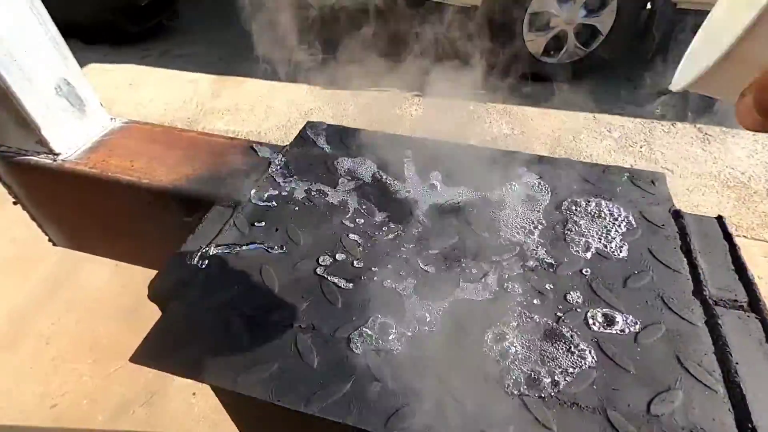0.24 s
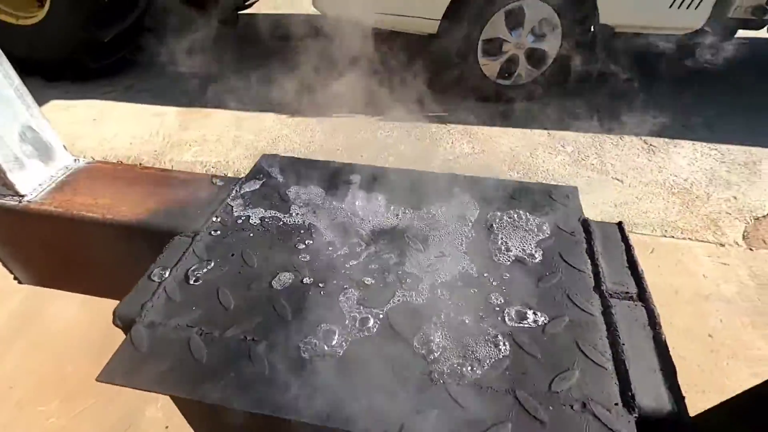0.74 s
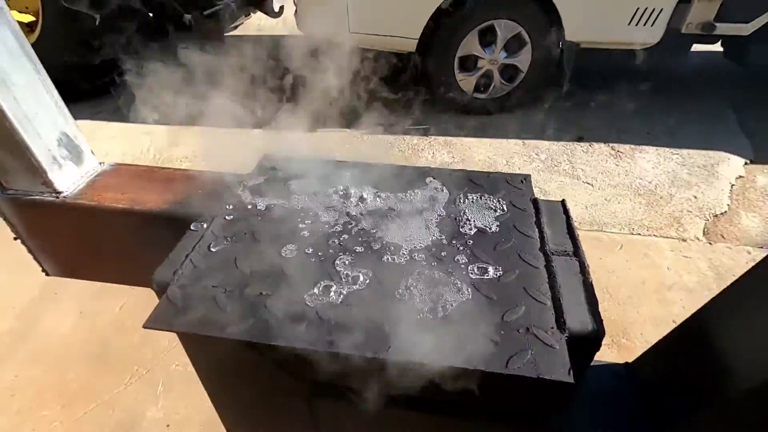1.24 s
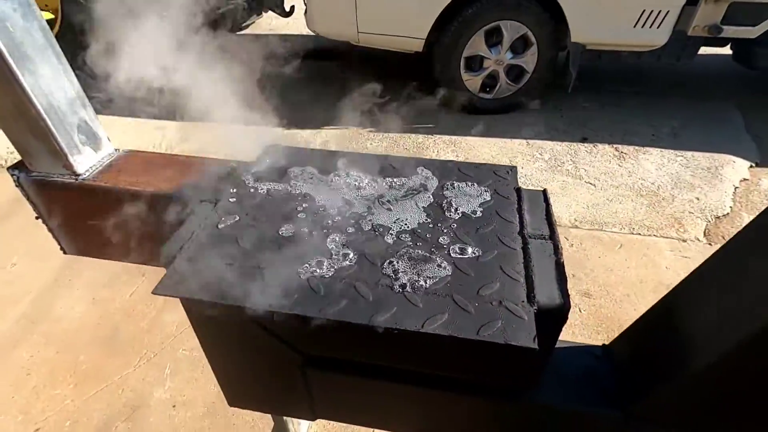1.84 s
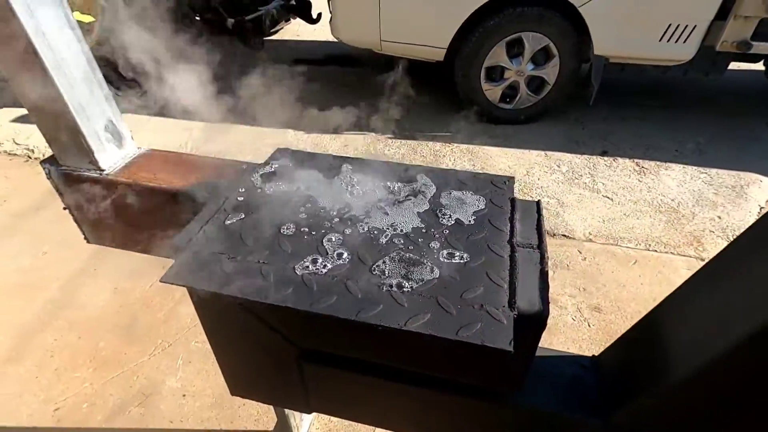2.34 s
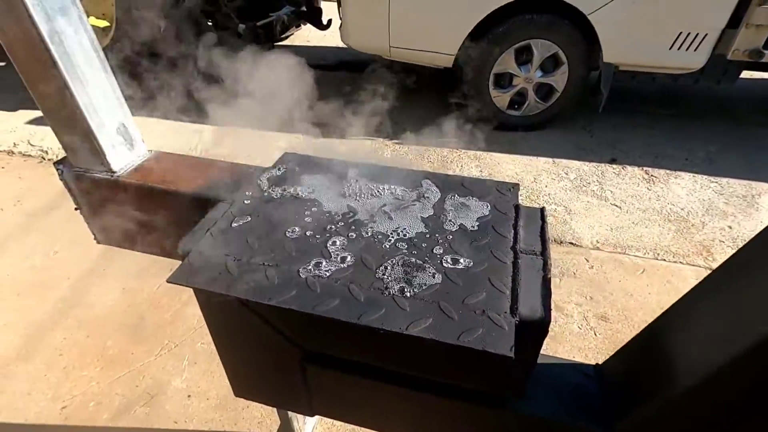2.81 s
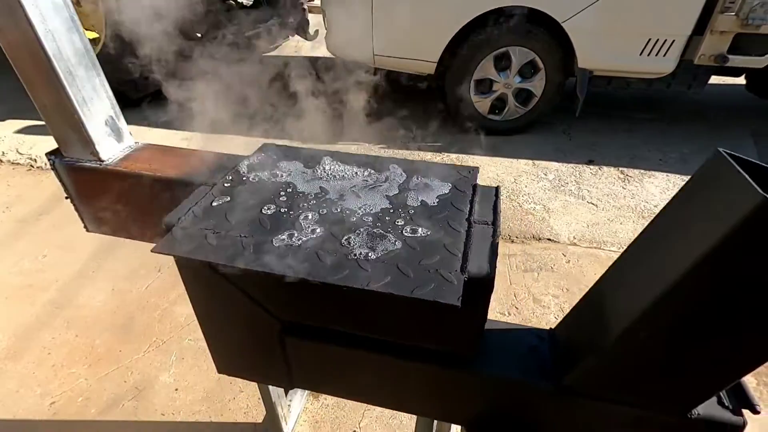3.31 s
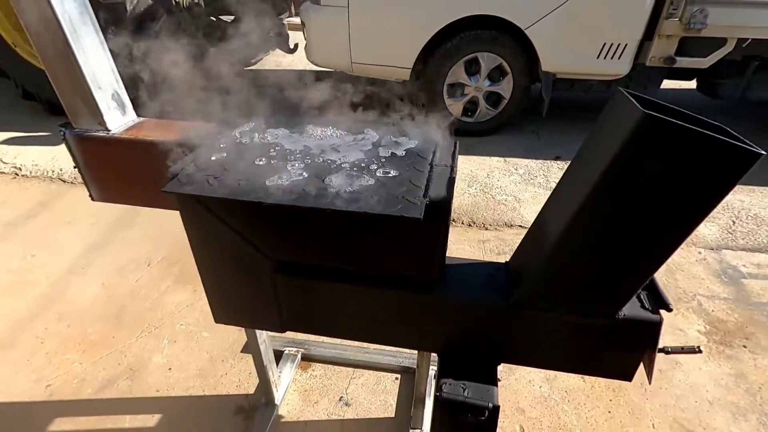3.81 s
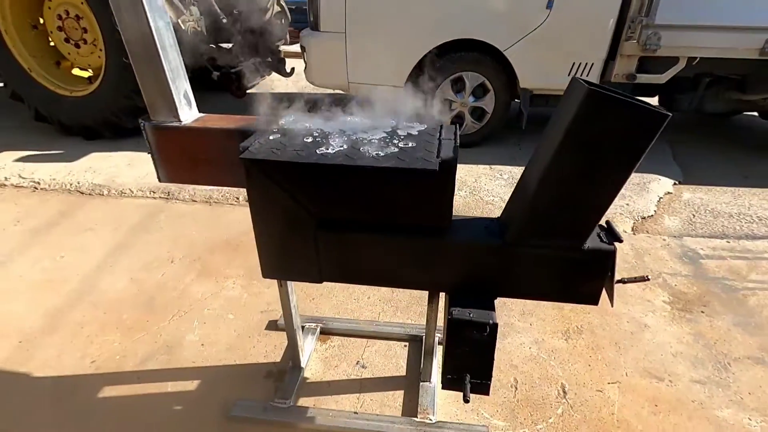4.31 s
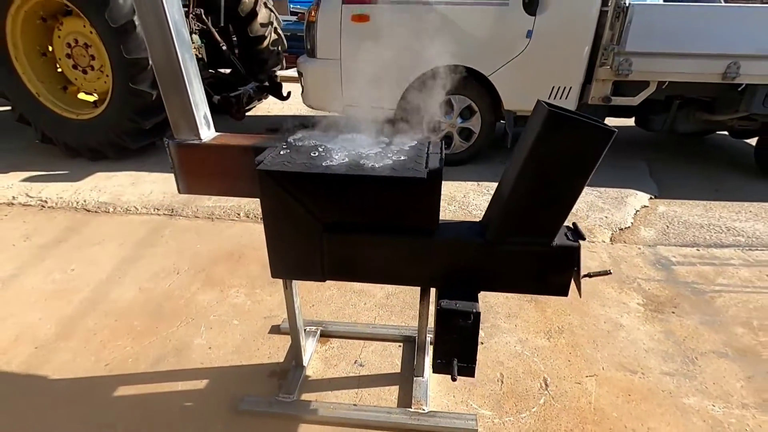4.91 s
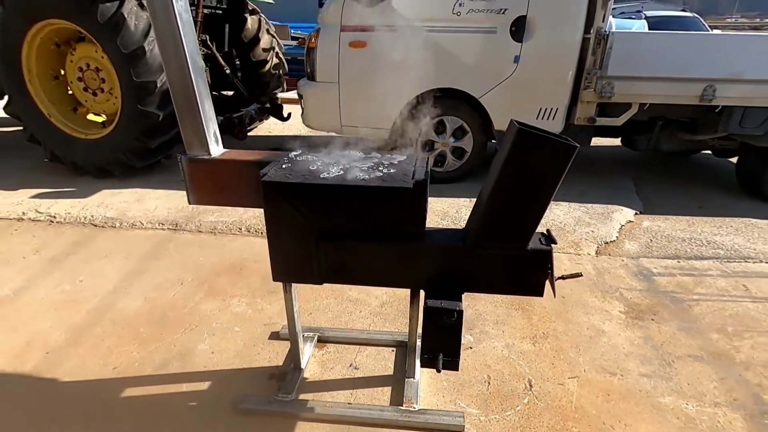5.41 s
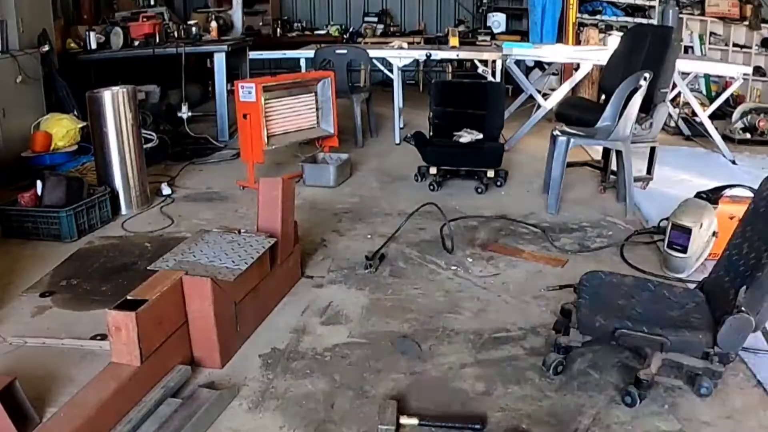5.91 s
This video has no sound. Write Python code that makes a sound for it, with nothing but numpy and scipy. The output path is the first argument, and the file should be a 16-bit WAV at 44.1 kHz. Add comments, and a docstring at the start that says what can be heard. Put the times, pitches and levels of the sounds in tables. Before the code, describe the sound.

From 0 s, water boils on a hot steel stove top close to the microphone: a dense, bright, crackling sizzle, strongest between the low mids and highs, wide in stereo. During the first 0.6 s the pour gurgles and low steam pockets plop softly. At about 0.7 s big blisters seethe and skating drops give a short falling whistle; a soft knock lands at 0.8 s. Coarse boiling swells near 1.1 and 1.5 s, then the sound leans left. Around 2 s a cluster of dull handling taps with a scuff and sharp tick occurs. From 3 s the sizzle recedes steadily, turning finer and narrower, with faint shifting resonances, while a deep, unsteady flue hum near 60 Hz and fire rumble rise. Soft double knocks come at 4 and 5 s. Faint open air and dull yard reflections remain until a louder hiss bursts at 5.99 s and stops abruptly.

```python
"""Outdoors, on the hot steel top of a wood stove, water boils in thousands of tiny steam bursts a second.
The sizzle fades as the camera backs away, and narrow resonant bands swell and fade in it as reflections
off plate and ground shift. The last of the pour gurgles and plops as ringing bubbles, and skating drops
whistle as gliding sines. The draught sounds a low hum in the flue. The hand on the camera rings its case
in soft knocks and a noisy scuff. A short, louder hiss of dense clicks ends the sound abruptly."""
import sys
import numpy as np
from scipy import signal
from scipy.fft import rfft, irfft, next_fast_len
from scipy.io import wavfile
from scipy.ndimage import map_coordinates

SR = 44100
rng = np.random.default_rng(int(sys.argv[2]) if len(sys.argv) > 2 else 0)


def to_wav(s):
    """Save 16-bit WAV."""
    ch = np.atleast_2d(s).T  # columns
    pcm = np.round(np.clip(ch, -1, 1) * 32767)  # PCM
    wavfile.write(sys.argv[1], SR, pcm.astype(np.int16))


N = 271215

# vigour of the boiling before distance loss: (time [s], relative level [dB])
BOIL_LEVEL = [(0, -45), (.27, -46.5), (.42, -45.5), (.5, -45), (.66, -46), (.95, -46), (1.05, -47.5),
              (1.22, -46.5), (1.5, -49.5), (1.73, -49), (1.93, -46.5), (2.3, -47), (3.3, -47), (3.8, -47),
              (5.97, -47)]
# spectrum of the steam bursts: (frequency [Hz], relative density [dB])
SIZZLE_SPECTRUM = [(240, -41), (400, -24), (702, -16), (980, -12.5), (1130, -7), (1410, -5), (1600, -4),
                   (2720, 0.5), (3270, 0.5), (5480, -6), (6680, -9), (8400, -16), (9060, -21), (11600, -25),
                   (14300, -35.5), (15200, -49)]
# colour of the microphone ports: (centre [Hz], width [Hz], gain [dB])
PORT_RESONANCES = [(1250, 230, 1.5), (3040, 300, .5), (5600, 370, -1.5), (6230, 460, 2), (8440, 390, -5.5),
                   (8940, 270, 6), (13700, 800, -1.5)]
# left-right likeness of the sizzle before width and lean: (frequency [Hz], correlation [0-1])
SIZZLE_LIKENESS = [(300, 0.92), (1000, 1), (1500, 0.96), (2500, 0.97), (4000, 0.96), (6500, 0.9),
                   (8300, 0.71), (8950, 0.7), (10000, 0.59), (12500, .5), (14000, 1)]
# full lean to the left: (frequency [Hz], left minus right [dB])
LEAN_SPECTRUM = [(1000, -1), (1600, 7), (3000, 4), (4200, 3.5), (7000, 2.5), (10000, 0.5)]
# the camera turns and backs away: (time [s], distance [m], share of the full lean [0-1])
CAMERA_PATH = [(0, 0.52, 0.08), (.5, 0.53, 0.084), (1.05, 0.48, 0.41), (2.4, 0.53, 0.48),
               (3.17, 0.58, 0.43), (4.0, 0.81, 0.5), (4.6, 1.24, 0.63), (5.3, 2.11, 0.57), (5.97, 2.2, 0.6)]
# stereo width: side gain at half a metre [dB], its loss per dB of distance
WIDTH_DB, NARROWING = -0.5, 0.35
# the water first spreads right across the view, so it sounds wider: fade start [s], fade [s], extra [dB]
NEAR_S, NEAR_FADE_S, NEAR_WIDTH_DB = 0.45, 0.61, 3.5
# blisters grow, then collapse, and the coarse boiling swells: (peak [s], rise [s], fall [s], swell [dB])
BLISTER_SURGES = [(1.1, .75, 0.11, 4), (1.105, .015, .03, 1.5), (1.5, 0.45, 0.41, 4.5),
                  (3.335, .025, 0.071, 3.5), (3.5, .03, 0.054, 2), (5.03, .15, .05, 4),
                  (5.25, .03, 0.2, 6.5)]
# water on dry steel throws fine spray: (peak [s], rise [s], fall [s], swell [dB])
SPRAY_SURGES = [(.72, .04, 0.59, 2), (1.2, 0.058, 0.22, 1.5), (1.62, .2, .25, 0.5), (3.86, .03, 0.049, 0.5),
                (4.72, 0.029, .08, 1.8)]
# the puddles thin out, so the boiling turns finer; band gains while wet and when thin
THIN_S, THIN_LENGTH_S = 3.6, 0.84
COARSE_WET_DB, COARSE_THIN_DB = -0.5, -4.5
FINE_WET_DB, FINE_THIN_DB = 0, 3
TOP_WET_DB, TOP_THIN_DB = 1.5, 2.5
# single sharp bursts that stand out: rate [1/s], level against the other clicks [dB]
SNAP_RATE, SNAP_DB = 45, -18.5
# narrow resonant bands in the sizzle, from reflections off plate and ground:
# (middle [s], length [s], centre [Hz], peak level at 1 m [dB])
REFLECTION_BANDS = [(1.404, 0.46, 2180, -58), (2.05, 0.35, 2120, -58), (2.729, 0.57, 2620, -55),
                    (4.2, .55, 4340, -59), (5.2, .5, 5300, -63), (5.748, .6, 6130, -61)]
# gurgles of the poured water: (middle [s], length [s], bubble pitch [Hz], peak level [dB])
POUR_GURGLES = [(.09, 0.24, 240, -63.5), (.34, 0.2, 483, -61.5), (.56, 0.12, 253, -65)]
# the fresh puddle boils in big blisters: start, rise, level and fade
SEETHE_S, SEETHE_RISE_S, SEETHE_DB, SEETHE_FADE_DB_PER_S = 0.67, 0.042, -55, 15
# drops whistling on their steam cushions:
# (start [s], length [s], mean start pitch [Hz], mean end pitch [Hz], mean peak level [dB])
DROP_WHISTLES = [(0.71, 0.119, 1800, 1380, -45.5), (0.566, 0.033, 800, 645, -55),
                 (0.727, 0.073, 1300, 1420, -52)]
# big steam pockets: (onset [s], starting pitch [Hz], t60 [s], level before the soft start [dB])
STEAM_POCKETS = [(.101, 175, 0.053, -38), (.14, 245, 0.077, -46), (0.36, 150, .14, -49),
                 (.415, 145, .05, -46), (.492, 135, .06, -44), (0.528, 191, .06, -45), (.59, 210, .06, -51),
                 (.937, 175, 0.055, -50), (1.055, 170, 0.054, -52), (2.052, 170, .05, -47)]
# soft start; share by which the pitch rises over one t60
PLOP_ATTACK_S, PLOP_RISE = 0.0041, 0.22
# soft knocks on the camera, most landing more than once:
# (onset [s], level [dB], pitch factor on the case modes [-], t60 before mode share [s], tick level [dB])
CASE_KNOCKS = [(.8148, -31.5, 1.16, 0.011, -55.5), (1.9685, -42, 0.67, .022, -43),
               (1.974, -42, 0.82, .028, -45), (1.98, -50, 0.88, .015, -42), (1.9965, -50, 1.4, .015, -40),
               (2.001, -48, 0.66, .02, -28), (2.005, -45, 0.72, 0.028, -44), (2.012, -45, 1.1, 0.022, -44),
               (4.0112, -47, 1.9, .015, -60), (4.0147, -36, 0.97, 0.042, -60),
               (4.0287, -39, 1.22, 0.029, -64), (4.046, -46, 1.3, .025, -66), (4.996, -51.5, 1, .015, -52),
               (4.9987, -40.5, 0.98, 0.037, -51), (5.0145, -36, 2.3, 0.0083, -47),
               (5.0245, -49, 1.0, 0.033, -56), (5.056, -58, 1.1, .02, -50)]
# modes of the camera case: (frequency at pitch factor 1 [Hz], level in the knock [dB], share of its t60 [-])
CASE_MODES = [(210, -19, 0.61), (291, 6, 0.69), (450, -10, 0.97)]
CONTACT_S = 0.0013  # soft skin rounds the front of each knock
TAIL_DB, TAIL_T60_S = -10.5, 0.35  # faint tail of the knocks
# spectrum of the knocks' ticks: (frequency [Hz], gain [dB])
TICK_SPECTRUM = [(100, -4.5), (600, 2.5), (1500, 15), (4000, 1), (8000, -5), (14000, -28)]
# spectrum of skin dragging on the case: (frequency [Hz], relative density [dB])
SKIN_SPECTRUM = [(80, -10), (165, 14.5), (260, 6), (380, 11.5), (700, 4), (1200, 11.5), (2500, -15),
                 (6000, -6), (7200, 11), (8700, 4), (9600, -5), (15000, -21)]
SCUFF_S, SCUFF_LENGTH_S, SCUFF_DB = 1.994, 0.064, -42.5  # middle, length, peak level
# the closing hiss: (frequency [Hz], relative density [dB])
HISS_SPECTRUM = [(80, -31), (200, -11), (550, -18), (1400, -4.5), (3500, -2), (6000, -10.5), (10000, -24),
                 (15000, -37)]
HISS_START_S, END_S = 5.989, 6.02
# the stove's draught, strongest beside the fire mouth: (time [s], level without flares [dB])
DRAUGHT_LEVEL = [(0, -71), (.7, -66), (.95, -79), (1.3, -60.5), (2.0, -69), (2.35, -73), (3.03, -76),
                 (3.1, -62), (3.19, -56), (3.27, -50), (3.45, -54), (3.64, -61), (3.73, -51.5), (4.07, -48),
                 (4.17, -54.5), (4.3, -50), (4.5, -52), (4.6, -45), (4.8, -46.5), (5.0, -47.5), (5.42, -47),
                 (5.55, -51.5), (5.97, -51.5)]
# the fire flares up: (middle [s], length [s], peak gain added to the draught [dB])
FIRE_FLARES = [(.008, 0.05, -49.5), (1.52, 0.42, -61.5), (2.081, .02, -56), (2.14, 0.028, -49),
               (2.167, .026, -47), (3.345, 0.1, -47.5)]
# the flue's lowest resonance: (time [s], mean pitch [Hz])
FLUE_PITCH = [(0, 60.6), (3.05, 60), (3.33, 54.96), (3.8, 62.2), (4.15, 56.6), (4.58, 61.33), (4.9, 58.24),
              (5.25, 59), (5.45, 57.1), (5.97, 58.9)]
FLUE_DRIFT_HZ, THROB_DB = 1.096, -15  # scale of its unsteadiness; turbulence around the pitch
# turbulence around the lowest and the next flue resonance: (frequency [Hz], relative density [dB])
THROB_SPECTRUM = [(35, -40.5), (50, -19), (56, -2), (68, 1.5), (75, -15.5), (110, -48), (300, -100)]
UPPER_SPECTRUM = [(60, -46.5), (80, -14.0), (92, 0.0), (104, -25.0), (170, -22.5), (400, -93.5)]
# rumble of the fire: (frequency [Hz], relative density [dB])
RUMBLE_SPECTRUM = [(10, -34.5), (20, 5), (45, -2), (60, 5), (75, -2.5), (90, -0.5), (115, -12.5),
                   (200, -28.5), (400, -100)]
# level at full draught [dB], dB per dB of draught, full draught [dB]
RUMBLE_DB, RUMBLE_FOLLOWS, FULL_DRAUGHT_DB = -56.5, 0.32, -53.5
# outdoor air: (frequency [Hz], relative density [dB])
AIR_SPECTRUM = [(60, -22.5), (120, -2), (180, 4.5), (260, -2.5), (400, 0.5), (800, -7.5), (2000, -17.5),
                (8000, -51)]
AIR_DB, AIR_FADE_DB_PER_S = -61.5, 1.16
# the boiling as the yard throws it back: (frequency [Hz], relative density [dB])
YARD_SPECTRUM = [(300, -25.5), (800, -19), (1200, -1), (1700, -0.5), (2500, -9.5), (5000, -11.5),
                 (10000, -38)]
YARD_DB = -17.5  # level against BOIL_LEVEL
TOP_HZ = 15150  # band limit


def sizzle():
    """Random impulses: clumped steam bursts over their blurred hiss; big blisters are low, spray is high."""
    level_db, coarse_db, fine_db, top_db = boiling()
    clumps = amp(0.48 * wobble(70) + 0.14 * wobble(350))
    blurred_hiss = rng.standard_normal((2, N))
    clicks = unit(clumps * (bursts(count=2, rate=11000, scatter_db=3) + blurred_hiss))
    clicks = clicks + amp(SNAP_DB) * bursts(count=2, rate=SNAP_RATE, scatter_db=1.0)
    steam = spread(ring(clicks, lambda hz: along(SIZZLE_SPECTRUM, hz) + port_db(hz)), SIZZLE_LIKENESS)
    # some blisters ring briefly before they burst
    blisters = bubbles(count=2400, centre_hz=3126, octaves=0.3, cycles=20.0, scatter_db=5.0)
    steam = steam + amp(-12.5) * blisters

    # complementary bands, each with its own level and flicker
    top = above(steam, 8400, order=20)
    coarse = steam - above(steam, 2300, order=8)
    fine = above(steam, 4900, order=6) - top
    middle = steam - coarse - fine - top
    flicker_db = 0.44 * wobble(25)
    mix = middle + amp(coarse_db + 0.7 * wobble(35)) * coarse
    mix = mix + amp(fine_db + flicker_db) * fine
    mix = mix + amp(top_db + flicker_db) * top
    return at_camera(amp(level_db + 1.34) * mix)


def boiling():
    """Distance law: level falls as 1/r; surges and thinning set the coarse, fine and top bands, all in dB."""
    level_db = curves(BOIL_LEVEL)[0] - 20 * np.log10(curves(CAMERA_PATH)[0])
    thin = ramp(THIN_S, THIN_LENGTH_S)
    spray_db = surges(SPRAY_SURGES)
    coarse_db = (1 - thin) * COARSE_WET_DB + thin * COARSE_THIN_DB + surges(BLISTER_SURGES)
    fine_db = (1 - thin) * FINE_WET_DB + thin * FINE_THIN_DB + spray_db
    top_db = (1 - thin) * TOP_WET_DB + thin * TOP_THIN_DB + spray_db
    return level_db, coarse_db, fine_db, top_db


def surges(rows):
    """Linear rise and fall, in dB, around each peak."""
    return sum(db * (ramp(s - rise, rise) - ramp(s, fall)) for s, rise, fall, db in rows)


def port_db(hz):
    """Port resonance: Gaussian peaks and dips in the response, in dB."""
    return sum(db * np.exp(-0.5 * ((hz - centre) / width) ** 2) for centre, width, db in PORT_RESONANCES)


def at_camera(x):
    """Apparent source width: wide when near, narrow when far; the side facing the plate hears more."""
    distance_m, lean = curves(CAMERA_PATH)
    width_db = WIDTH_DB - NARROWING * 20 * np.log10(2 * distance_m)
    width_db = width_db + NEAR_WIDTH_DB * (1 - ramp(NEAR_S, NEAR_FADE_S))
    mid = x.mean(axis=0)
    x = mid + amp(width_db) * (x - mid)
    half_each = np.array([[0.5], [-0.5]])
    leaning = filtered(x, lambda hz: amp(half_each * along(LEAN_SPECTRUM, hz)))
    return x + lean * (leaning - x)


def reflections():
    """Interference: reflections shifting with the moving camera, heard as narrow bands of ringing grains."""
    bands = 0
    for s, length, hz, db in REFLECTION_BANDS:
        band = bubbles(count=2500, centre_hz=hz, octaves=0.035, cycles=14, scatter_db=2.0)
        bands = bands + swell(s, length, db) * band
    return bands / curves(CAMERA_PATH)[0]


def water():
    """Damped bubble resonance gives gurgle and seethe; skating drops are unsteady, gliding sines."""
    out = np.zeros(N)
    for s, length, hz, db in POUR_GURGLES:
        gurgle = bubbles(count=500, centre_hz=hz, octaves=0.3, cycles=4, scatter_db=-1.0)
        out = out + swell(s, length, db) * gurgle

    seethe_db = SEETHE_DB - SEETHE_FADE_DB_PER_S * (np.arange(N) / SR - SEETHE_S)
    seethe = ramp(SEETHE_S, SEETHE_RISE_S) * amp(seethe_db)
    out = out + seethe * bubbles(count=1800, centre_hz=808, octaves=0.35, cycles=3.2, scatter_db=-1.0)

    for s, length, start_hz, end_hz, db in DROP_WHISTLES:
        life = ramp(s, length)
        hz = (start_hz + (end_hz - start_hz) * life) * (1 + 0.0066 * wobble(120))
        whistle = np.sin(2 * np.pi * np.cumsum(hz) / SR)
        out = out + amp(db + 1.8 * wobble(91)) * np.sin(np.pi * life) * whistle
    return out


def plops():
    """Volume resonance of big steam pockets: short, damped low notes that rise a little."""
    out = np.zeros(N + SR)
    t = np.arange(SR // 5) / SR
    for s, hz, t60, db in STEAM_POCKETS:
        turns = hz * (t + PLOP_RISE * t ** 2 / (2 * t60))
        envelope = amp(db - 60 * t / t60) * (1 - np.exp(-t / PLOP_ATTACK_S))
        out[round(s * SR):][:len(t)] += envelope * np.sin(2 * np.pi * turns)
    return out[:N]


def handling():
    """Modal excitation: contacts ring the camera case and tick; a dragging finger makes friction noise."""
    thumps, ticks = np.zeros((2, N + SR))
    t = np.arange(SR // 8) / SR
    for s, db, pitch, t60, tick_db in CASE_KNOCKS:
        case = 0
        for hz, level_db, share in CASE_MODES:
            decay = amp(-60 * t / (t60 * share))
            case = case + amp(level_db) * np.sin(2 * np.pi * pitch * hz * t) * decay
        thumps[round(s * SR):][:len(t)] += amp(db) * (1 - np.exp(-t / CONTACT_S)) * case
        tick = rng.standard_normal(len(t)) * np.exp(-t / 0.0008)
        ticks[round(s * SR):][:len(t)] += amp(tick_db) * tick
    coloured_ticks = ring(ticks[None], lambda hz: along(TICK_SPECTRUM, hz))

    grains = bursts(count=2, rate=1500, scatter_db=3.0)
    scuff = spread(ring(grains, lambda hz: along(SKIN_SPECTRUM, hz)), [(100, 0.97)])
    scuff = swell(SCUFF_S, SCUFF_LENGTH_S, SCUFF_DB) * scuff
    return thumps[:N] + afterring(thumps) + coloured_ticks + scuff


def afterring(x):
    """Diffuse decay: a faint tail of exponentially fading noise behind x."""
    t = np.arange(SR // 2) / SR
    tail = rng.standard_normal(len(t)) * amp(-60 * t / TAIL_T60_S) * (1 - np.exp(-t / 0.02))
    return amp(TAIL_DB) * signal.fftconvolve(x, tail / np.linalg.norm(tail))[:N]


def last_hiss():
    """Dense impulse noise: clicks of fluctuating strength fuse into an abrupt, crackling hiss."""
    crackle = bursts(count=2, rate=6000, scatter_db=3) * amp(1.0 * wobble(300))
    hiss = spread(ring(crackle, lambda hz: along(HISS_SPECTRUM, hz)), [(100, 0.91)])
    return amp(-38) * (np.arange(N) / SR > HISS_START_S) * hiss


def stove():
    """Pipe resonance: draught sounds the flue's lowest mode and, fainter, the next; fire rumbles in open air."""
    flares = sum(swell(s, length, db) for s, length, db in FIRE_FLARES)
    draught_db = 20 * np.log10(amp(curves(DRAUGHT_LEVEL)[0]) + flares)
    pitch_hz = curves(FLUE_PITCH)[0] + FLUE_DRIFT_HZ * wobble(10)
    hum = unit(np.sin(2 * np.pi * np.cumsum(pitch_hz) / SR) * amp(2.6 * wobble(22)))
    throb = noise(THROB_SPECTRUM, likeness=1.0)
    upper = noise(UPPER_SPECTRUM, likeness=0.92)
    flue = amp(draught_db) * (amp(-3.5) * hum + amp(THROB_DB) * throb + amp(-16.0) * upper)

    rumble_db = RUMBLE_DB + RUMBLE_FOLLOWS * (draught_db - FULL_DRAUGHT_DB)
    rumble = amp(rumble_db) * noise(RUMBLE_SPECTRUM, likeness=0.94)
    air_db = AIR_DB - AIR_FADE_DB_PER_S * np.arange(N) / SR
    air = amp(air_db + 1.1 * wobble(16)) * noise(AIR_SPECTRUM, likeness=0.83)
    return flue + rumble + air


def yard():
    """Diffuse field: a dull wash of the boiling that does not fade as the camera backs away."""
    return amp(curves(BOIL_LEVEL)[0] + YARD_DB) * noise(YARD_SPECTRUM, likeness=0.1)


def bursts(count, rate, scatter_db):
    """Poisson-like impulses: count streams of random clicks, rate a second, of scattered sizes."""
    fires = rng.random((count, N)) < rate / SR
    sizes = amp(scatter_db * np.minimum(rng.standard_normal((count, N)), 2.2))
    return unit(fires * sizes * np.sign(rng.standard_normal((count, N))))


def bubbles(count, centre_hz, octaves, cycles, scatter_db):
    """Damped oscillation: grains ring for some cycles, as bubbles do, each at its own pitch and moment."""
    when = rng.random(count)
    pitch, size = rng.standard_normal((count, 2)).T
    hz = np.minimum(centre_hz * 2 ** (octaves * pitch), SR / 4)[:, None]
    n = np.arange(SR // 32)
    turns = hz * n / SR
    sizes = amp(scatter_db * np.minimum(size, 2))[:, None]
    waves = sizes * np.sin(2 * np.pi * turns) * np.exp(-turns / cycles)
    places = (when * N).astype(int)[:, None] + n
    return unit(np.bincount(places.ravel(), waves.ravel(), minlength=N)[:N])


def noise(spectrum, likeness):
    """Filtered Gaussian noise: coloured stereo of rms 1."""
    coloured = filtered(rng.standard_normal((2, N)), lambda hz: amp(along(spectrum, hz)))
    return spread(coloured, [(100, likeness)])


def spread(pair, alike):
    """Interchannel correlation: mixes two unrelated signals to the given left-right likeness."""
    def mid_side(hz):
        """Mid and side gains on a quarter circle."""
        turn = np.arccos(np.clip(along(alike, hz), -1, 1)) / 2
        return np.array([np.cos(turn), np.sin(turn)])

    mid, side = filtered(pair, mid_side)
    return unit(np.array([mid + side, mid - side]))


def ring(x, colour_db):
    """Minimum phase: a causal filter with the given dB curve keeps the sharp front of clicks."""
    size = 4096
    cepstrum = irfft(np.log(amp(colour_db(np.fft.rfftfreq(size, 1 / SR))) + 1e-6))
    # fold the cepstrum onto positive time
    cepstrum[1:size // 2] *= 2
    cepstrum[size // 2 + 1:] = 0
    impulse = irfft(np.exp(rfft(cepstrum)))
    return signal.fftconvolve(x, impulse[None], axes=1)[:, :N]


def filtered(x, response):
    """Linear filtering: the spectrum of x times a response of frequency."""
    m = next_fast_len(N + SR // 2)
    return irfft(rfft(x, m) * response(np.fft.rfftfreq(m, 1 / SR)), m)[..., :N]


def above(x, edge_hz, order):
    """Zero-phase high-pass at edge_hz."""
    return filtered(x, lambda hz: 1 - 1 / (1 + (hz / edge_hz) ** order))


def along(points, hz):
    """Log-frequency interpolation of (frequency [Hz], value) points."""
    f, v = np.transpose(points)
    return np.interp(np.log(hz + 1), np.log(f + 1), v)


def curves(rows):
    """Linear interpolation in time: one value per sample for each column after the first."""
    s, *cols = np.transpose(rows)
    return [np.interp(np.arange(N) / SR, s, c) for c in cols]


def wobble(rate):
    """Band-limited fluctuation: a smooth random curve, rate knots a second."""
    knots = rng.standard_normal(int(N * rate / SR) + 4)
    return map_coordinates(knots, [np.arange(N) * rate / SR])


def ramp(start, length):
    """Linear rise from 0 to 1 over length seconds."""
    return np.clip((np.arange(N) / SR - start) / length, 0, 1)


def swell(middle, length, db):
    """Half-sine envelope: the gain of one smooth rise and fall."""
    return amp(db) * np.sin(np.pi * ramp(middle - length / 2, length))


def amp(db):
    """Decibels to amplitude ratio."""
    return 10 ** (np.asarray(db) / 20)


def unit(x):
    """Normalisation of x to rms 1."""
    return x / np.sqrt(np.mean(x ** 2) + 1e-20)


def scene():
    """Superposition of plate, water, hand, stove and yard."""
    boil = sizzle() + reflections()
    return boil + water() + plops() + handling() + last_hiss() + stove() + yard()


def record(dry):
    """Gating and band limiting: the sound stops short with a tiny tail, with nothing above TOP_HZ."""
    after = np.arange(N) / SR - END_S
    gate = np.where(after < 0, 1, amp(-14.5) * np.exp(-np.abs(after) / 0.0048))
    return filtered(dry * gate, lambda hz: hz < TOP_HZ)


dry = scene()
out = record(dry)
to_wav(out)
```